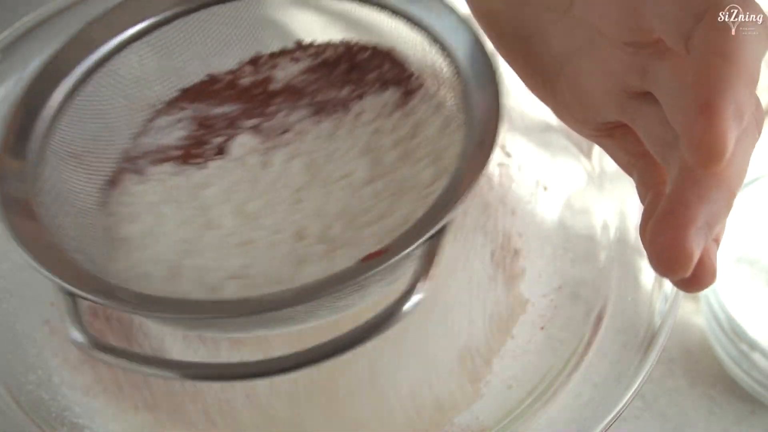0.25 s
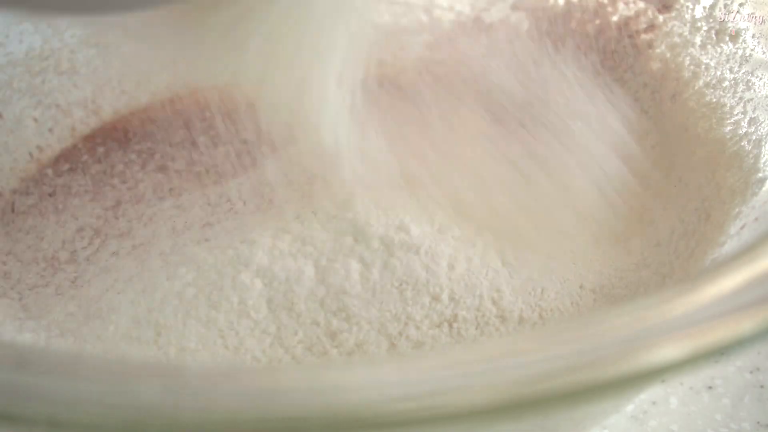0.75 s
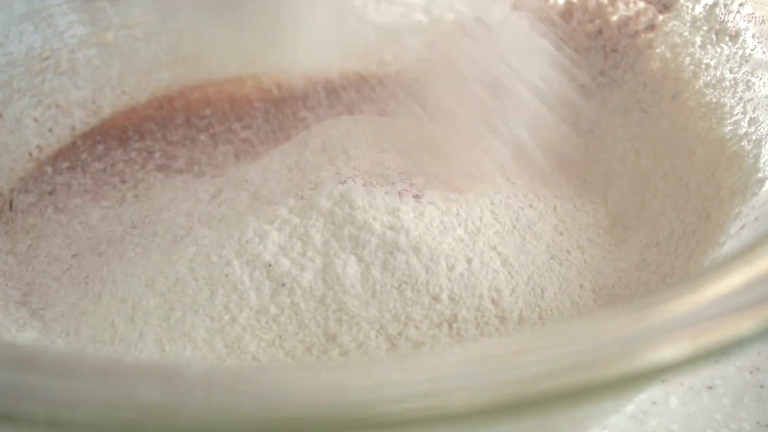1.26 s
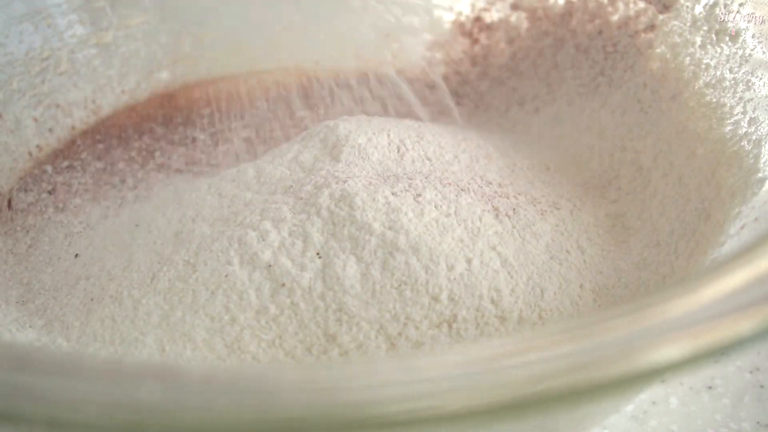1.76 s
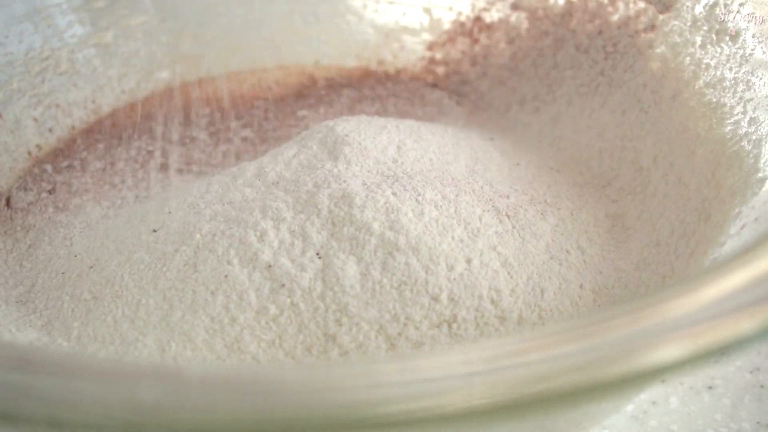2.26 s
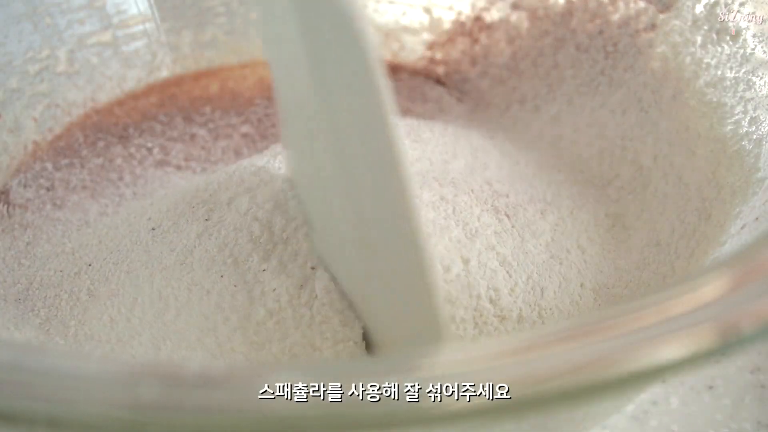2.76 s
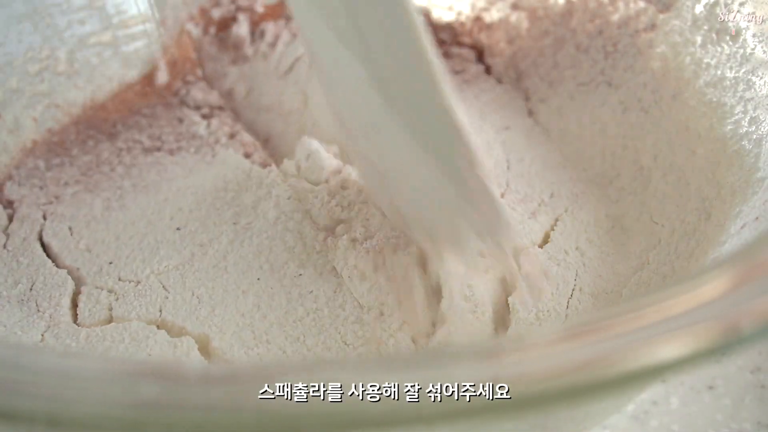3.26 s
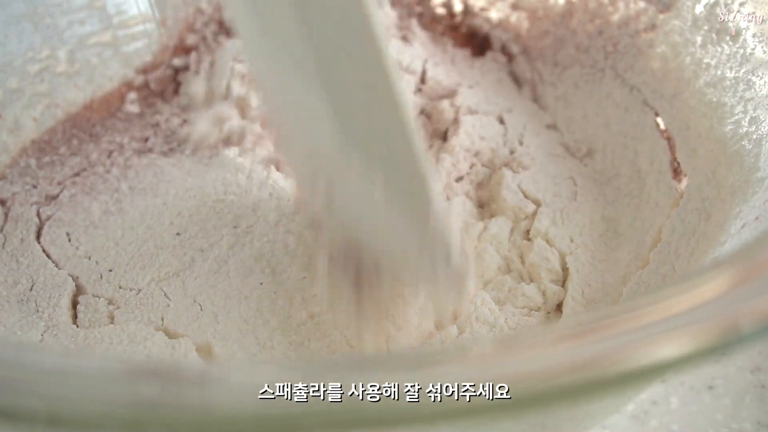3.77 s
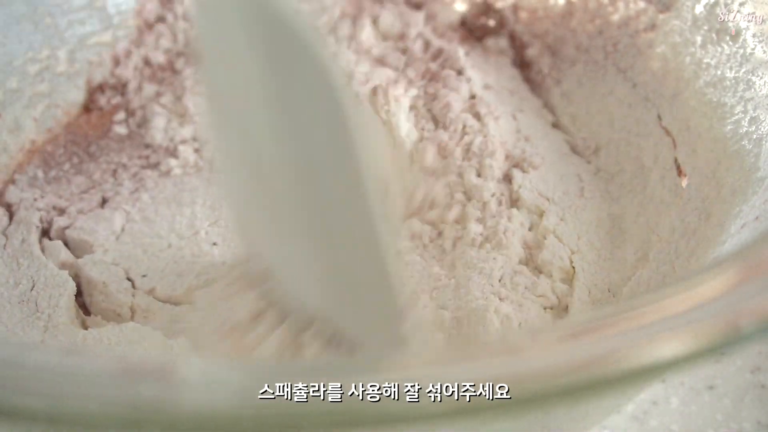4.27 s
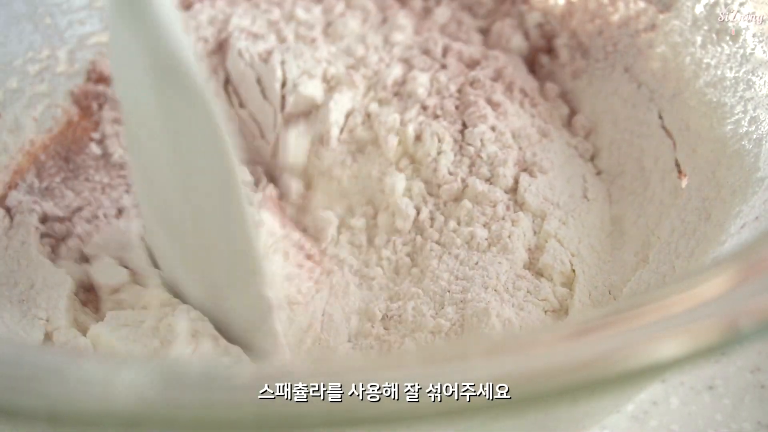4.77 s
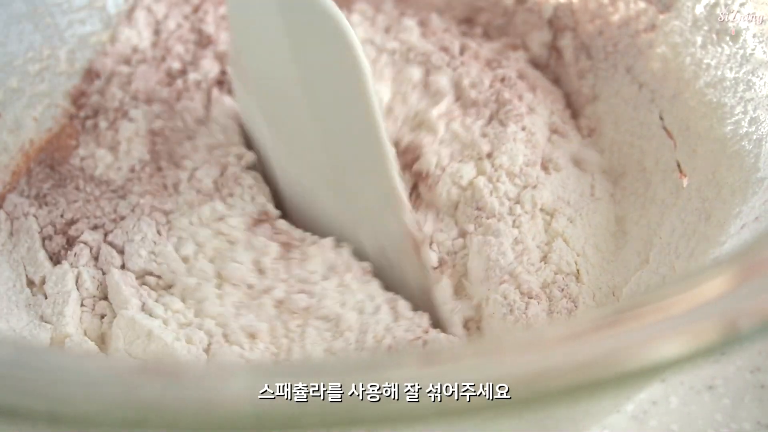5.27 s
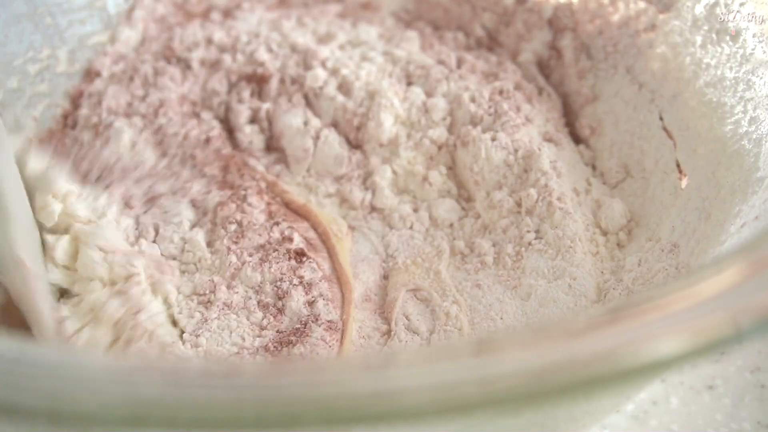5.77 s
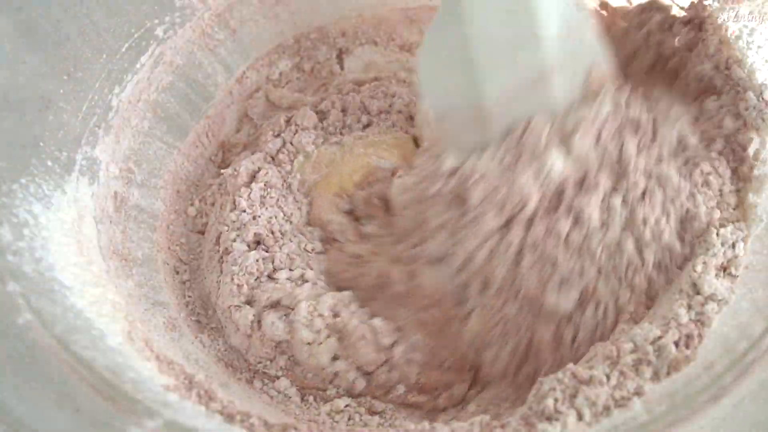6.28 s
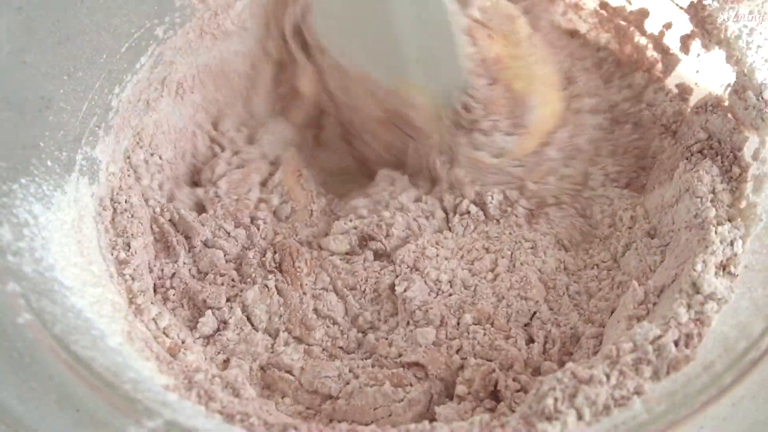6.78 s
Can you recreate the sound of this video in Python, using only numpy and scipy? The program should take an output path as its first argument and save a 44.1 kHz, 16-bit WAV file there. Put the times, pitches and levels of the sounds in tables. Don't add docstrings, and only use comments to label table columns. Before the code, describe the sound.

A close, dry stereo pair on the kitchen counter, with low room hum and faint hiss throughout. From 0.15 to 2.25 s a hand pats a mesh sieve thirteen times, steadily, roughly every 0.17 s: soft bassy thumps, faint rim ticks, brief frame creaks early on, and airy flour hiss around each pat, strongest before 1 s and then fading. Flour patters very faintly below. At 2.5 s comes a crisp tick and powder scrape, then a thin faint glass squeak. From 2.85 s a spatula stirs unevenly, with dull knocks near 3.1, 3.4, 3.9, 4.35, 4.8 and 5.2 s, dry crunchy strokes and little glass clicks. Each nudge leaves a deep stand rumble swaying left against right. Around 5.9-6.2 s a gritty wipe sinks in pitch while the bowl grumbles; softer strokes and knocks continue to about 7 s.

```python
import sys
import numpy as np
from scipy import signal
from scipy.io import wavfile
from scipy.ndimage import uniform_filter1d

SR = 44100
rng = np.random.default_rng(int(sys.argv[2]) if len(sys.argv) > 2 else 0)


def to_wav(s):
    ch = np.atleast_2d(s).T
    pcm = np.round(np.clip(ch, -1, 1) * 32767)
    wavfile.write(sys.argv[1], SR, pcm.astype(np.int16))


def linear_from_db(decibels):
    return 10 ** (np.asarray(decibels, float) / 20)


N = 310023
T = np.arange(N) / SR


def unit(x):
    return x / np.sqrt(np.mean(x ** 2))


def band(x, hz, width):
    return signal.lfilter(*signal.iirpeak(hz, hz / width, fs=SR), x)


def pair(like):
    mid, side = rng.standard_normal((2, N))
    common = np.sqrt((1 + like) / 2) * mid
    opposed = np.sqrt((1 - like) / 2) * side * np.array([[1], [-1]])
    return common + opposed


def walk(rate):
    hold = int(SR / rate)
    levels = np.repeat(rng.standard_normal(N // hold + 1), hold)
    return 0.94 * uniform_filter1d(levels, hold)[:N]


def swell(start, length, blunt):
    return np.sin(np.pi * np.clip((T - start) / length, 0, 1)) ** blunt


def strike(times, gains, modes, push_s):
    t = T[:2 * SR]
    ring = 0
    for hz, t60, left, right in modes:
        mode = np.sin(2 * np.pi * hz * t) * 1000 ** (-t / t60)
        ring = ring + np.outer([left, right], mode)
    push = np.hanning(int(push_s * SR))
    blows = np.zeros(N)
    blows[(times * SR).astype(int)] = gains
    blows = np.convolve(blows, push / push.sum(), "same")
    return signal.fftconvolve(blows[None], ring, axes=1)[:, :N]


def powder(modes, like, grit_db, rate):
    grains = pair(like) * linear_from_db(grit_db * walk(rate))
    return unit(sum(linear_from_db(db) * band(grains, hz, width) for hz, width, db in modes))


# t/s, thump/dB, swing hiss/dB, rebound hiss/dB, rim tick/dB
SIEVE_PATS = [(0.152, -43, -65, -69, -50.5), (0.322, -41, -64.5, -61, -60), (0.495, -37.5, -59, -62.5, -63),
              (0.671, -36.5, -57.5, -61, -75), (0.845, -36.5, -58.5, -64, -56),
              (1.024, -37, -62.5, -65, -54), (1.203, -36.5, -64.5, -64.5, -57),
              (1.376, -37, -66.5, -70, -53.5), (1.557, -38.5, -68.5, -70.5, -58),
              (1.727, -37.5, -74, -75, -58), (1.898, -38.5, -72, -79, -59), (2.07, -38.5, -83, -80, -56),
              (2.245, -33.5, -80, -72, -53.5)]
# f/Hz, T60/s, left gain/1, right
AIR_SHOVE = [(15.1, 0.22, -0.47, 0.35), (21, 0.25, -0.37, 0.17), (54.4, 0.09, 0.53, 0.037),
             (98, 0.028, 0.75, -0.64), (208, 0.0087, 0.99, 0.55)]
# f/Hz, width/Hz, level/dB
MESH_HISS = [(4930, 3600, 2), (9400, 2200, 2), (1770, 4500, -9)]


def sieve():
    s, thump_db, swing_db, rebound_db, tick_db = np.transpose(SIEVE_PATS)
    t = T - s[:, None]
    swing = np.exp(-0.5 * ((t + 0.022) / 0.023) ** 2)
    rebound = np.exp(-0.5 * ((t - 0.048) / 0.016) ** 2)
    tick = (t > 0) * np.exp(-np.abs(t) / 0.0039)
    flow = linear_from_db(swing_db) @ swing + linear_from_db(rebound_db) @ rebound + linear_from_db(tick_db) @ tick
    hiss = flow * powder(MESH_HISS, like=0.84, grit_db=0.5, rate=300)
    hiss = hiss * linear_from_db([[0.7], [-0.7]])
    thump = strike(s + 0.0022, linear_from_db(thump_db + 15.5), AIR_SHOVE, push_s=0.0048)
    return hiss + thump


# t/s, length/s, f/Hz, level/dB
FRAME_CREAKS = [(0.098, 0.07, 283, -53), (0.103, 0.066, 780, -60.5), (0.291, 0.047, 292, -52.5),
                (0.283, 0.047, 756, -55.5), (1.404, 0.034, 890, -57), (1.58, 0.073, 1180, -66.5)]


def creaks():
    out = 0
    for s, length, hz, db in FRAME_CREAKS:
        groan = unit(band(pair(0.69), hz, 0.076 * hz))
        out = out + linear_from_db(db) * swell(s, length, 0.37) * groan
    return out


def landing():
    level_db, end_s, fade_s = -69, 1.6, 1
    flow = np.clip((end_s + fade_s - T) / fade_s, 0, 1)
    patter = powder([(606, 340, -1.2), (1130, 460, 0.24)], like=0.5, grit_db=4.5, rate=46)
    return linear_from_db(level_db) * flow * patter


# fastest t/s, run-up/s, run-out/s, level/dB, depth/dB (deep is dull)
BLADE_STROKES = [(2.5, 0.011, 0.41, -68.5, -9), (2.98, 0.49, 0.11, -72, 8.5), (3.075, 0.056, 0.13, -64, -2),
                 (3.28, 0.22, 0.1, -67.5, 0), (3.381, .06, 0.031, -71, -5), (3.46, 0.048, 0.47, -71, 8),
                 (3.9, 0.097, 0.067, -82, -12), (4.01, 0.1, 0.21, -61.5, -3), (4.34, .2, 0.035, -70, -4),
                 (4.441, .07, 0.19, -60, -4), (4.83, 0.042, .1, -59.5, 2), (4.89, .06, 0.23, -66, 1),
                 (5.15, 0.22, 0.17, -71.5, -9), (5.29, 0.055, .15, -62.5, -7), (5.66, 0.34, 0.15, -65, -5),
                 (5.75, 0.081, 0.14, -69.5, -3), (5.84, 0.13, 0.32, -60, 1.5),
                 (6.14, 0.061, 0.063, -69, 6.5), (6.04, 0.22, 0.078, -92, 4),
                 (6.2, 0.087, 0.047, -69.5, 10), (6.33, .06, 0.35, -71, -4),
                 (6.678, 0.048, 0.13, -60.5, 0.5), (6.9, 0.37, 0.12, -69.5, 3.5)]


def strokes():
    s, up, down, db, depth_db = np.transpose(BLADE_STROKES)
    t = T - s[:, None]
    range_db, fine_db, fine_per_depth = 23.5, -10.5, 0.5
    speed = linear_from_db(-range_db * np.maximum(-t / up[:, None], t / down[:, None]))
    scrape = linear_from_db(db) @ speed
    drag = linear_from_db(db + depth_db) @ speed
    fine = linear_from_db(db + fine_db - fine_per_depth * depth_db) @ speed
    scrape_modes = [(2900, 2400, -2.0), (4520, 1500, -6.0), (5650, 170, -7.5)]
    out = scrape * powder(scrape_modes, like=0.84, grit_db=3.0, rate=150)
    out += drag * powder([(640, 190, -0.38), (1180, 720, -1.1)], like=0.8, grit_db=4.5, rate=60)
    out += fine * powder([(10100, 1200, 0)], like=0.36, grit_db=3.5, rate=180)
    return out


# start t/s, length/s, level/dB
GLASS_RUBS = [(3.3, 0.19, -87), (4.28, .25, -75), (4.79, 0.18, -75), (5.2, 0.17, -80), (5.688, 0.27, -72),
              (6.101, 0.11, -63.5), (6.65, 0.38, -80)]
# f/Hz, width/Hz, level/dB
GLASS_MODES = [(2740, 200, 1.5), (4050, 120, 3.5), (5500, 93, -1), (5740, 100, 1.5), (7700, 79, -12),
               (9500, 200, -7.5), (11000, 200, -4.5)]


def rubbed_glass():
    ring = sum(linear_from_db(db) * swell(start, length, 0.2) for start, length, db in GLASS_RUBS)
    return ring * powder(GLASS_MODES, like=0.96, grit_db=5.5, rate=53)


WIPE_TIME = 5.89, .25
# from f/Hz, to f/Hz, width/Hz, level/dB
WIPE_BAND = (1748.5, 900, 898, -59.5)


def wipe():
    start, length = WIPE_TIME
    from_hz, to_hz, width_hz, db = WIPE_BAND
    turns = np.cumsum(np.interp(T, [start, start + length], [from_hz, to_hz])) / SR
    lowpass = signal.butter(4, width_hz / 2, fs=SR, output="sos")
    a, b = (signal.sosfilt(lowpass, pair(0.8)) for _ in range(2))
    rub = unit(a * np.cos(2 * np.pi * turns) + b * np.sin(2 * np.pi * turns))
    return linear_from_db(db + 1.2 * walk(80)) * swell(start, length, 0.6) * rub


def spatula():
    return (strokes() + rubbed_glass() + wipe()) * linear_from_db([[0.8], [-0.8]])


# start t/s, length/s, f/Hz, width/Hz, level/dB
BLADE_SQUEAK = [
    (2.58, 0.33, 4095, 28, -76),
    (2.616, 0.24, 5650, 120, -80),
]


def squeak():
    out = 0
    for s, length, hz, width, db in BLADE_SQUEAK:
        out = out + linear_from_db(db) * swell(s, length, 0.23) * unit(band(pair(0.4), hz, width))
    return out


# t/s, peak level/dB,
# centre f/Hz
GLASS_TICKS = [(1.41, -66, 950), (2.4873, -36.5, 1300), (2.4876, -43, 700), (2.4886, -45, 3440),
               (2.8828, -48.5, 2500), (2.9236, -50, 3500), (2.9632, -46, 2980), (3.427, -48.5, 1060),
               (3.904, -72, 1020), (3.983, -47.5, 1100), (4.0311, -45.5, 2000), (4.0527, -56.5, 1060),
               (4.0866, -63, 1100), (4.371, -44.5, 1330), (4.427, -43, 2240), (4.494, -58, 1020),
               (4.5438, -51, 1030), (4.813, -44.5, 2000), (4.8286, -53, 1230), (4.8354, -43, 2000),
               (4.954, -48.5, 900), (5.23, -44, 2330), (5.232, -41, 720), (5.5478, -46.5, 520),
               (5.7957, -45, 3450), (5.84, -46.5, 3020), (5.9458, -46, 1900), (5.9924, -62, 1460),
               (6.3984, -48, 555), (6.662, -55, 1370)]


def ticks():
    out, t = np.zeros((2, N)), T[:3000]
    noise = signal.lfilter(*signal.butter(2, 5440, fs=SR), pair(0.85))
    fade = 1000 ** (-t / 0.017) + 0.057 * 1000 ** (-t / 0.48)
    for s, db, hz in GLASS_TICKS:
        i = int(s * SR)
        crack = fade * noise[:, i:i + len(t)]
        crack = band(band(crack, hz, 1.55 * hz), hz, 1.55 * hz)
        out[:, i:i + len(t)] += linear_from_db(db) * crack / np.abs(crack).max()
    return out


# t/s, knock/dB, stand shake/dB, hardness/dB
FLOOR_KNOCKS = [(2.853, -38, -31, 0), (3.087, -31.5, -34.5, 5), (3.393, -31, -28.5, 0),
                (3.608, -55, -46.5, 3), (3.901, -30, -25, -0.5), (4.093, -37.5, -42.5, 5),
                (4.345, -35.5, -26, 3), (4.786, -33, -25.5, 3), (4.951, -35, -43, 2),
                (5.206, -31, -26.5, -1), (5.542, -60, -57, 2.5), (5.885, -52.5, -49, 7),
                (6.391, -45.5, -71, 8.5), (6.578, -40, -37, -17), (6.871, -52, -63, 5),
                (6.91, -43.5, -54, 2.5)]
# f/Hz, T60/s, left gain/1, right gain/1
FOOT_MODES = [(156, 0.032, 0.67, 0.45), (153, 0.45, .04, 0.041)]
# f/Hz, T60/s, left gain/1, right gain/1
WALL_MODES = [(254.7, 0.048, -0.54, -0.6), (387, 0.028, 0.23, 0.13)]
# f/Hz, T60/s, left gain/1, right gain/1
STAND_MODES = [(18.6, 4, 0.075, 0.038), (23.26, 2.04, -0.036, 0.04), (38, 1.22, -0.17, 0.043),
               (68.06, 0.67, 0.48, -0.39), (72.9, 0.29, -0.86, 0.14), (97.6, 0.2, 0.31, -0.43),
               (91.8, 0.35, -0.22, 0.34)]


def knocks():
    s, knock_db, shake_db, hard_db = np.transpose(FLOOR_KNOCKS)
    foot = strike(s + 0.0029, linear_from_db(knock_db + 14.5), FOOT_MODES, push_s=0.0039)
    wall = strike(s + 0.0029, linear_from_db(knock_db + hard_db + 10.5), WALL_MODES, push_s=0.0036)
    shake = strike(s + 0.0059, linear_from_db(shake_db + 15.5), STAND_MODES, push_s=0.0042)
    return foot + wall + shake


# start t/s, length/s, level/dB
BOWL_PUSHES = [(5.422, 0.052, -72), (5.63, 0.21, -62.5), (5.932, 0.18, -51), (6.102, .13, -51),
               (6.834, 0.18, -62)]


def grumble():
    s, knock_db, *_ = np.transpose(FLOOR_KNOCKS)
    t = T - s[:, None]
    tail_db, tail_t60_s = -16.5, 0.19
    tails = linear_from_db(knock_db + tail_db) @ ((t > 0) * 1000 ** (-np.abs(t) / tail_t60_s))
    pushes = sum(linear_from_db(db) * swell(start, length, 0.89) for start, length, db in BOWL_PUSHES)
    foot_modes = [(50, 10, 2.5), (133, 63, 11), (320, 85, -3)]
    return (tails + pushes) * powder(foot_modes, like=0.73, grit_db=6.0, rate=28)


# t/s, level/dB
STAND_NUDGES = [(2.62, -37.5), (2.87, -24.5), (3.15, -29), (3.602, -37), (3.94, -20), (4.36, -22),
                (4.86, -22.5), (5.24, -20.5), (5.56, -32), (6.1, -28), (6.6, -28.5)]


def stand_rocking():
    rise_s, t60_s, sway_hz, wobble_db = 0.11, 1.86, 33, -16.5
    power = 0
    for start, db in STAND_NUDGES:
        t = np.maximum(T - start, 0)
        sway = linear_from_db(db) * np.minimum(t / rise_s, 1) * 1000 ** (-t / t60_s)
        power = power + sway ** 2
    rock = np.sin(2 * np.pi * sway_hz * T) * linear_from_db([[-0.5], [0.5]]) * [[1], [-1]]
    upper = band(band(pair(0.16), 41.8, 16.4), 41.8, 16.4)
    lower = band(pair(0.8), 23, 3.1)
    wobble = linear_from_db(wobble_db) * unit(upper + lower)
    return np.sqrt(2 * power) * (rock + wobble)


# f/Hz, level per Hz/dB
ROOM_SPECTRUM = [(7.1, -31), (12, 0), (32, 1.5), (49, -2), (140, -22.5), (255, -13.5), (315, -26.5),
                 (412, -22), (540, -21.5), (729, -28.5), (1140, -32), (1960, -39.5), (10800, -46.5),
                 (15500, -46)]
# f/Hz, left-right correlation/1
ROOM_LIKENESS = [(30, -0.42), (90, 0.31), (200, 0.62), (700, 0.3), (1500, 0.25), (5000, 0.17),
                 (15000, 0.014)]


def room():
    def at(table, hz):
        f, value = np.transpose(table)
        return np.interp(np.log(hz), np.log(f), value)

    out = 0
    for hz in 14 * 2 ** np.arange(0, 10.4, 0.5):
        noise = pair(np.clip(at(ROOM_LIKENESS, hz), -1, 1))
        noise = band(band(noise, hz, 0.5 * hz), hz, 0.5 * hz)
        out = out + linear_from_db(at(ROOM_SPECTRUM, hz) + 1.3 * walk(3.2)) * noise
    return unit(out) * linear_from_db(-49)


def scene():
    sifting = sieve() + creaks() + landing()
    stirring = spatula() + squeak() + ticks()
    counter = knocks() + grumble() + stand_rocking()
    return sifting + stirring + counter + room()


def top_cut(x):
    return signal.sosfilt(signal.butter(12, 15720, fs=SR, output="sos"), x)


def record(dry):
    return top_cut(dry)


dry = scene()
out = record(dry)
to_wav(out)
```